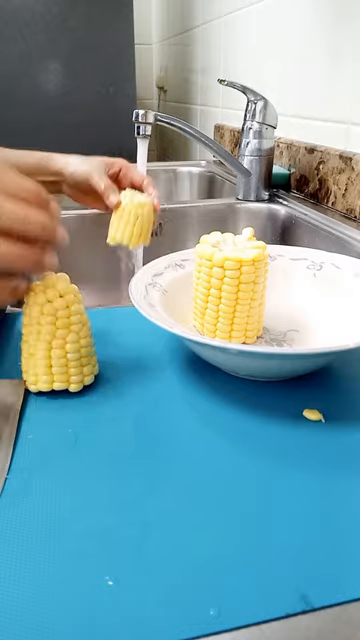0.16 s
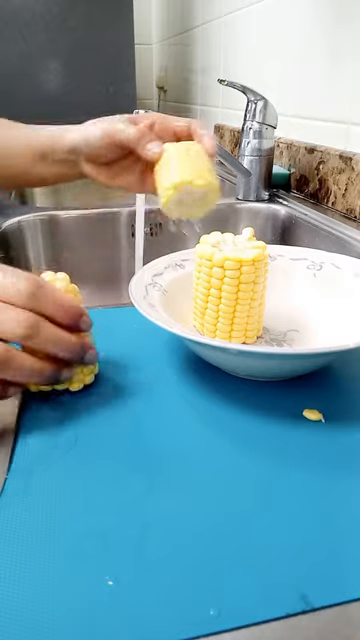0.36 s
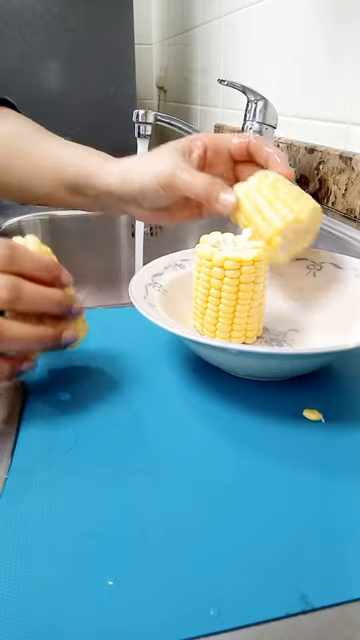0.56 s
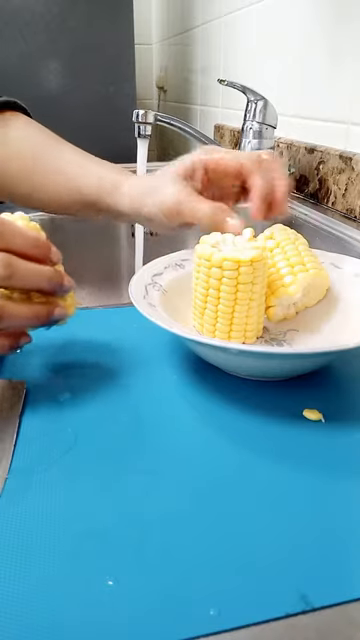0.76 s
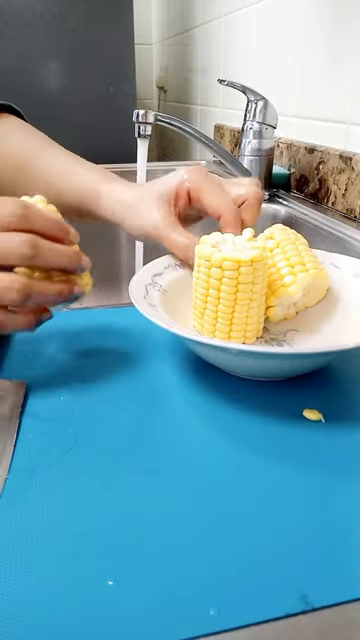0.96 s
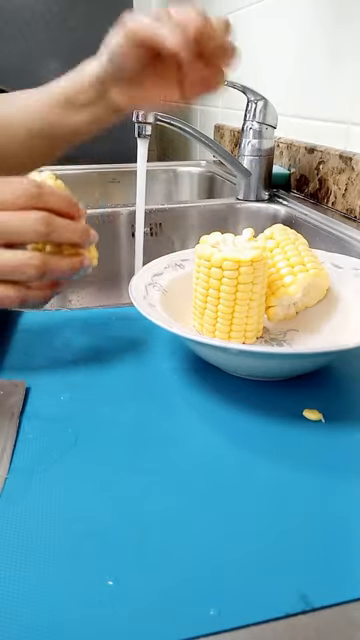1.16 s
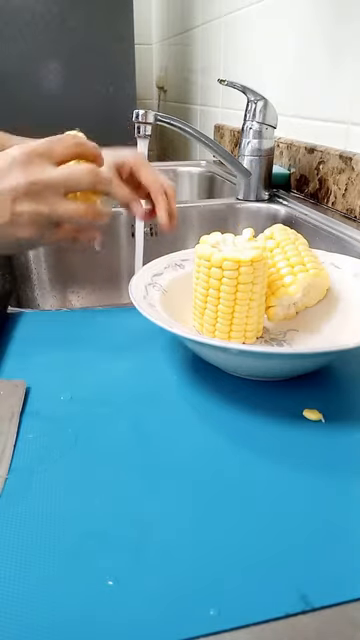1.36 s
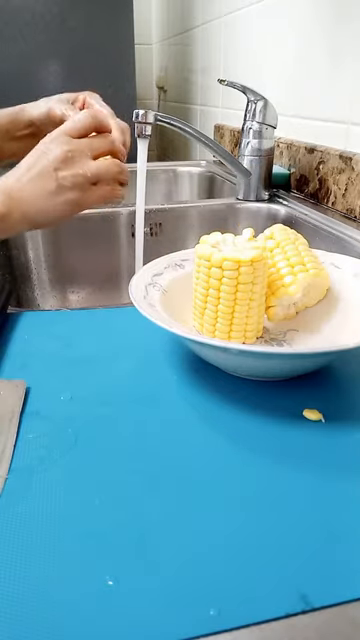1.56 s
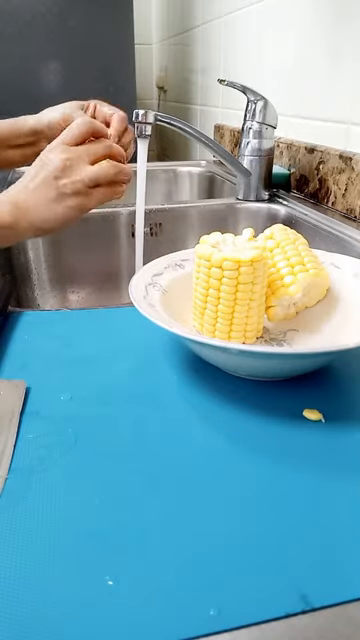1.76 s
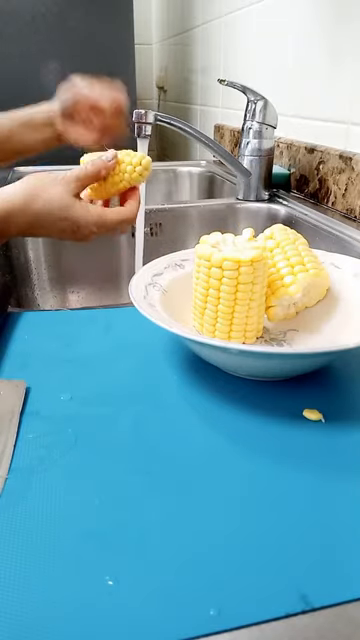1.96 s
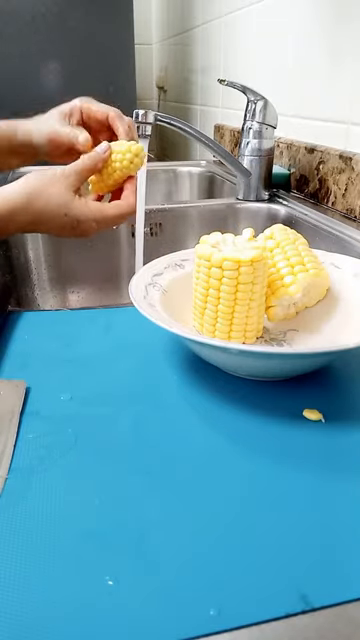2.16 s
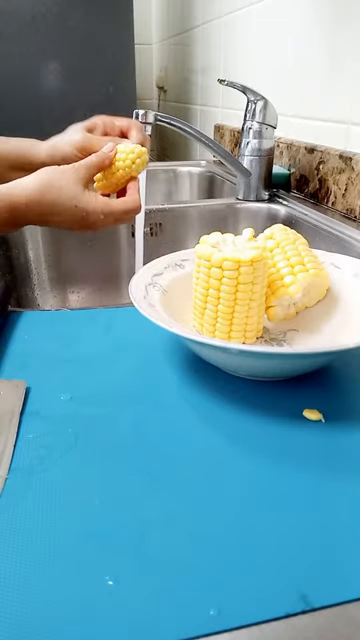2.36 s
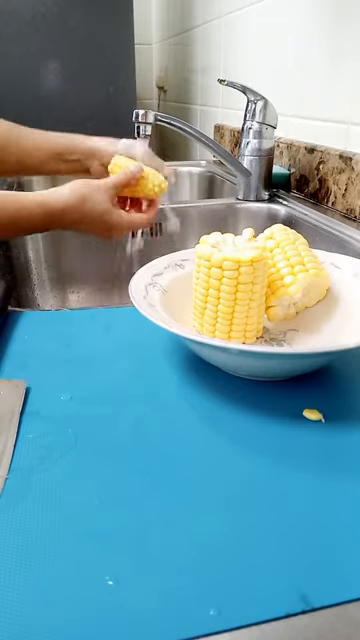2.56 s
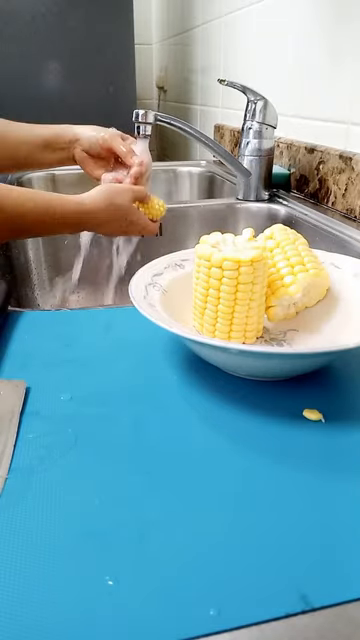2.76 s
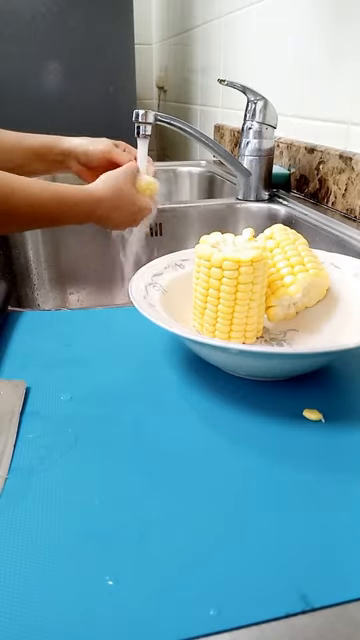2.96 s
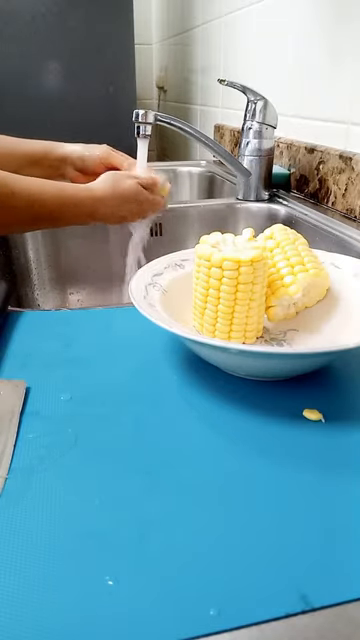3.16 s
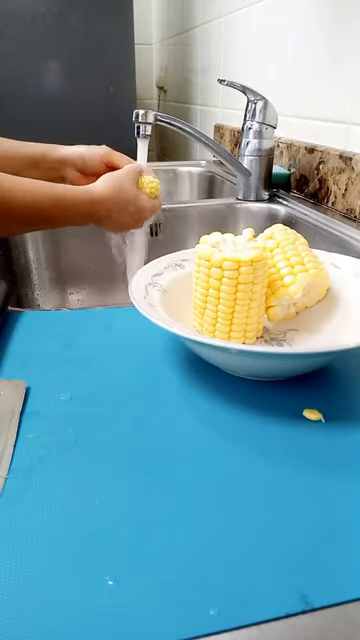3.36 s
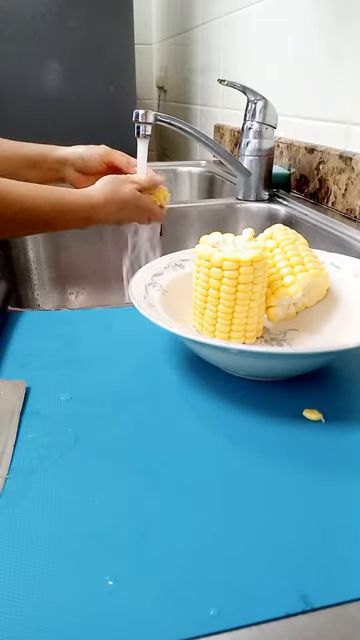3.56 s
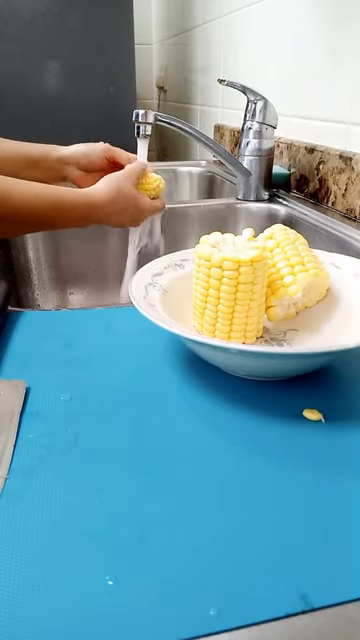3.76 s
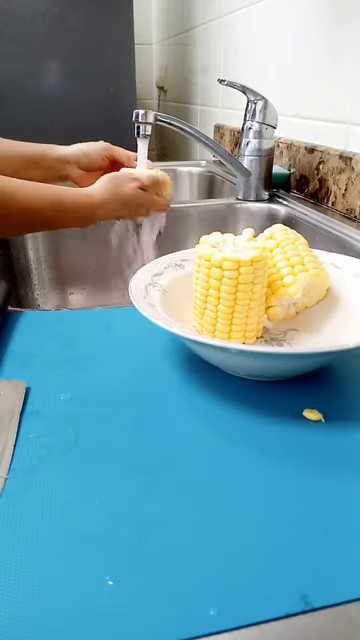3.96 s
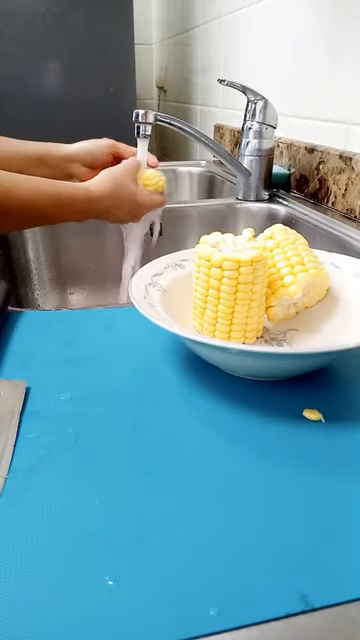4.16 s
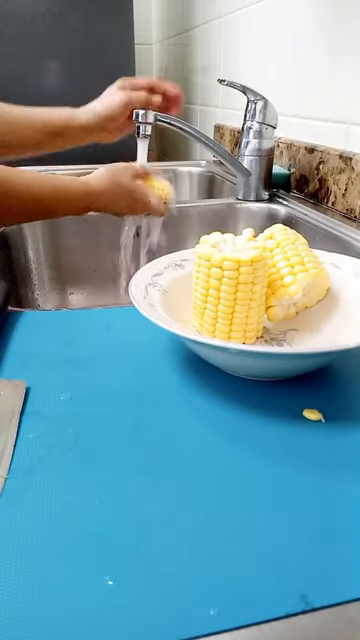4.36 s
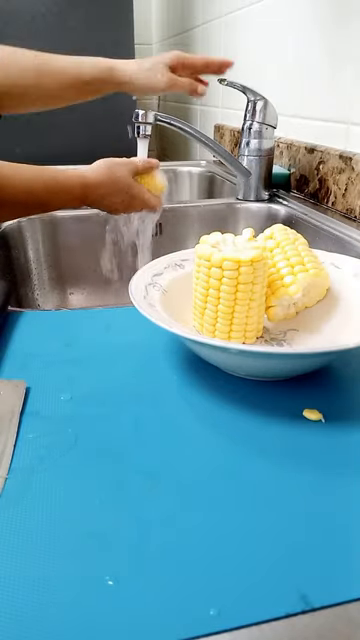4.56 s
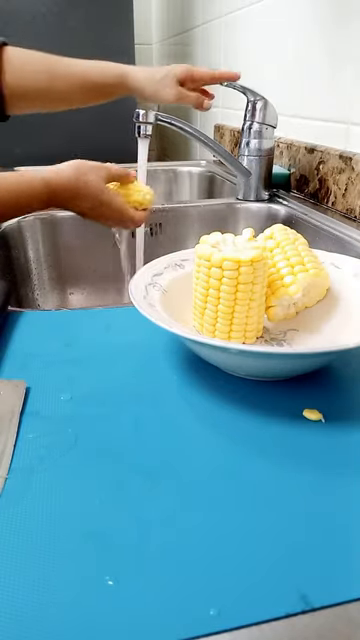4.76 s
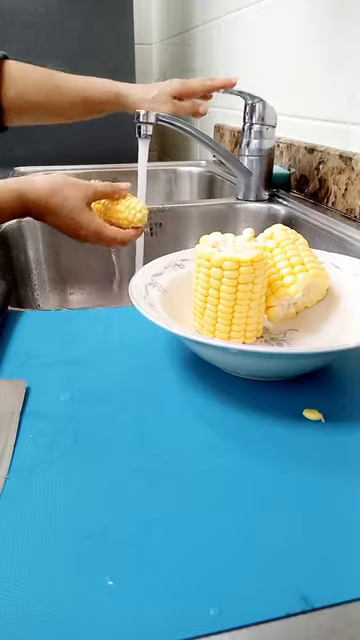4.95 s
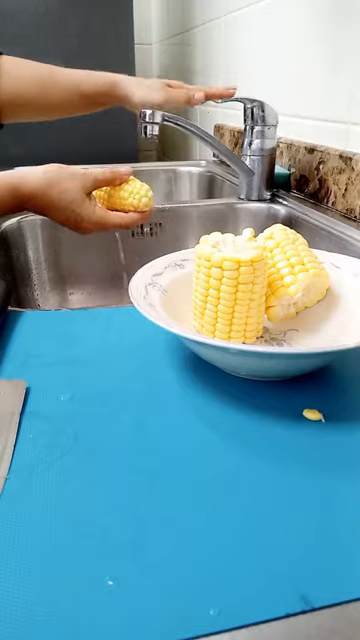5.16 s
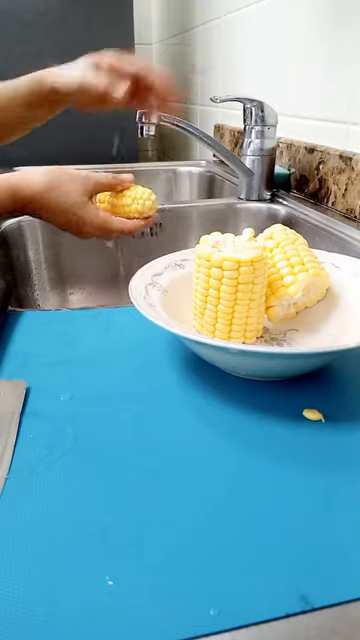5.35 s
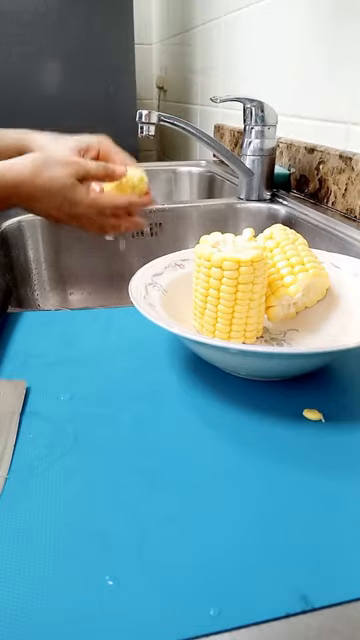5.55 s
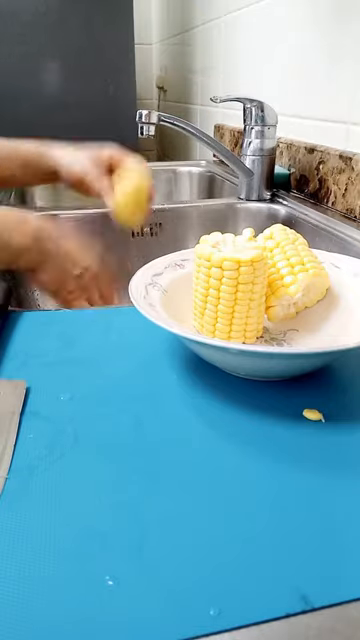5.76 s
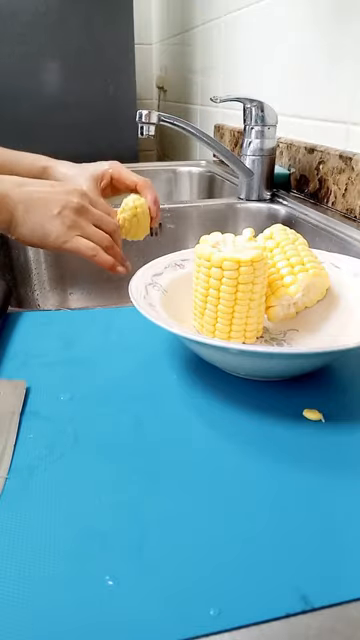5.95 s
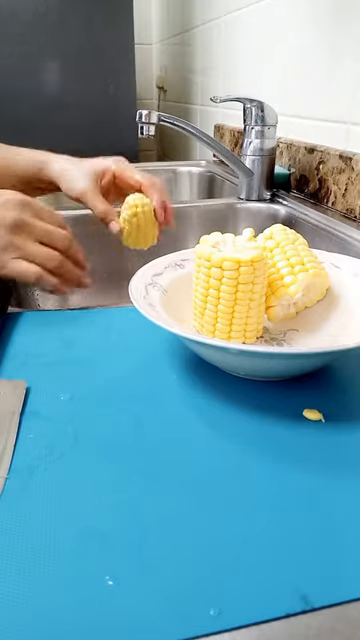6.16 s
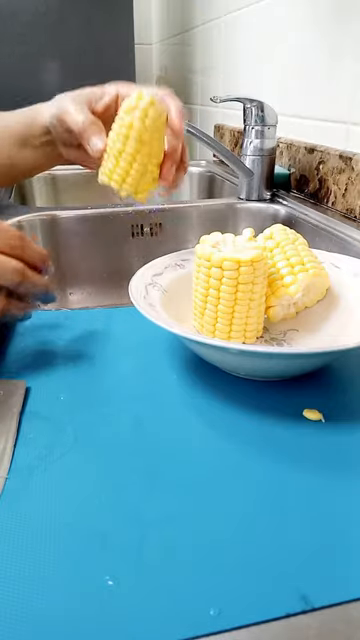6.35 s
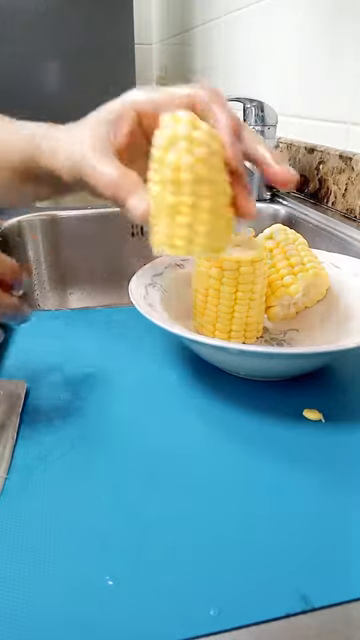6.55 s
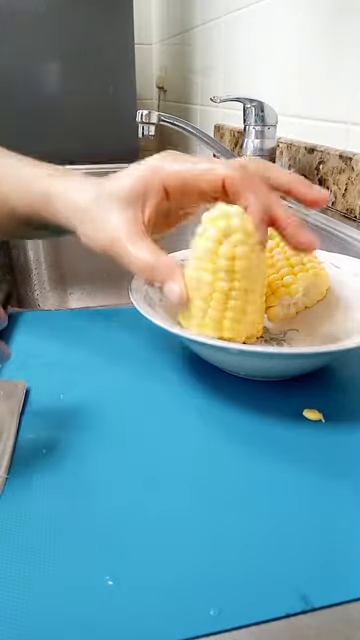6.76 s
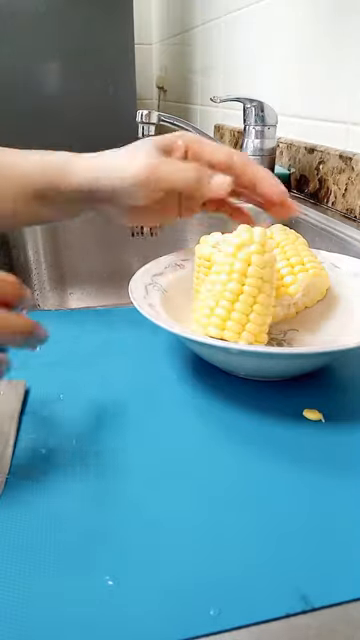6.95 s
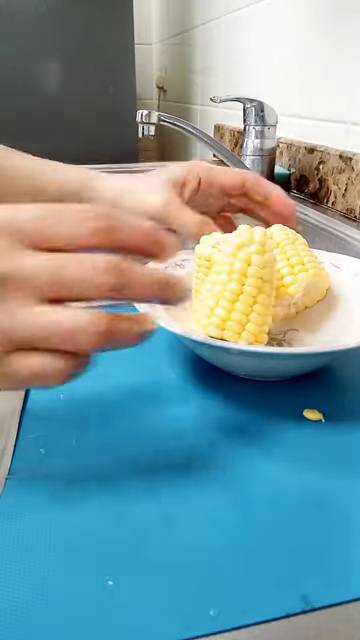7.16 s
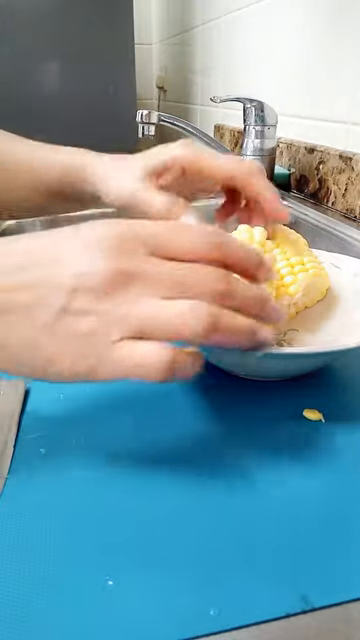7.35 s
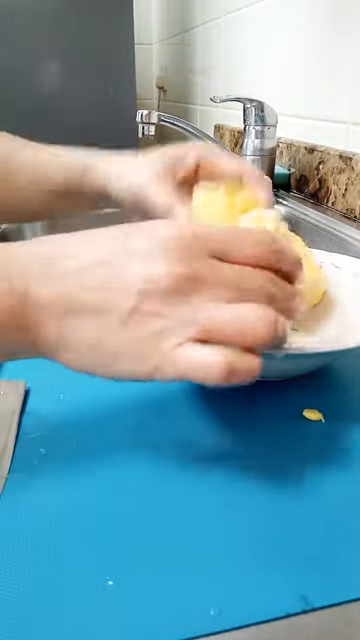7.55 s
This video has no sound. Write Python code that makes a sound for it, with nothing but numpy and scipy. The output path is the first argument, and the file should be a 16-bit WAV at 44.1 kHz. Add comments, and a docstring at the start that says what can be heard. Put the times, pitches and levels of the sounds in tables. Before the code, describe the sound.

A kitchen tap streams into a steel sink, a thump lands nearby, hands splash corn, the lever knocks it off, then drips and soft bowl knocks.

```python
"""A kitchen tap runs into a steel sink: patchy coloured noise with damped bubble chirps inside.
Early on, corn set down in a bowl thumps the counter by decaying modes; hands then rinse corn in the stream,
breaking it into noise-burst splashes and gliding squirts. The lever shuts with a knock of counter modes and a
bright noise rattle; drips plink as decaying sines over faint hiss, hum and whines, and late knocks come with
high ticks, clinks and a faint bowl ring. Two microphone ports stand close by on the counter."""
import sys
import numpy as np
from scipy import signal
from scipy.fft import rfft, irfft, next_fast_len
from scipy.io import wavfile
from scipy.ndimage import uniform_filter1d, map_coordinates

SR = 44100
rng = np.random.default_rng(int(sys.argv[2]) if len(sys.argv) > 2 else 0)


def rack_gain(trim_db):
    """Turn a fader trim in dB into the linear factor to multiply a signal by."""
    fader = np.asarray(trim_db, float)
    return 10 ** (fader / 20)


def unload_audio(sound):
    """Save the sound as a 16-bit wav file, at the path given as the first command line argument."""
    columns = np.transpose(np.atleast_2d(sound))
    # keep every value between -1 and 1, then stretch to whole-number steps
    steps = np.round(np.clip(columns, -1, 1) * 32767)
    wavfile.write(sys.argv[1], SR, steps.astype(np.int16))


N = 336031  # length [samples]

# How two ports hear a spread source: (frequency [Hz], left-right correlation [0-1])
PORT_LIKENESS = [(60, 1), (95, 0.94), (130, 0.92), (290, 0.77), (640, 0.8), (1400, 0.087), (3000, .02)]
# Phase between the ports: (frequency [Hz], lead of the left [rad])
PORT_LEAD = [(80, .05), (160, 0.64), (500, 1.62)]
# Level between the ports: (frequency [Hz], left over right [dB])
PORT_TILT = [(60, 4.5), (130, -9.5), (290, 7), (640, 1), (1410, -1), (3100, -0.5), (6820, -3.5),
             (15000, -2.5)]
# Reverberation of the kitchen: (frequency [Hz], t60 [s])
ROOM_DECAY = [(100, 0.13), (1000, 0.36), (8000, 0.1)]

# Hiss after the stream: (time [s], level [dB])
HISS_LEVEL = [(5.3, -63.5), (5.4, -60), (5.44, -77.5), (5.56, -70.5), (5.65, -65), (5.71, -77), (5.79, -71),
              (5.84, -70), (6, -68.5), (6.36, -61), (6.88, -59), (7.2, -66), (7.5, -61.5)]
# Hiss spectrum: (frequency [Hz], relative level [dB])
HISS_COLOUR = [(530, -51), (900, -8.5), (1580, -14.5), (1850, -4.5), (2300, -21.5), (2780, -14),
               (3100, -18.5), (4090, -22), (6610, -20.5), (8020, -38.5), (13800, -27.5), (14600, -30),
               (15900, -38)]
# Swells added to the hum: (time [s], level [dB], half width [s])
HUM_SWELLS = [(5.3, -47.5, 0.051), (6.02, -48, 0.12), (6.66, -36, 0.2), (7.24, -41, 0.063),
              (7.36, -40.5, 0.13), (7.62, -50.5, 0.03)]
# Thin tones: (frequency [Hz], level before the common rise [dB])
WHINE_TONES = [(1884, -66.5), (2724, -66), (3418, -80.5), (4145, -86.5)]
# Common rise of the thin tones: (time [s], gain [dB])
WHINE_RISE = [(5.45, -32.5), (6.05, -12.5), (6.25, 5), (7.62, 6.5)]
# Swells added to the lowest thin tone: (time [s], level [dB], half width [s])
LOWEST_WHINE_SWELLS = [(5.64, -59, 0.034), (5.8, -65, .12), (5.94, -57, 0.046), (6.64, -45, 0.07),
                       (6.89, -51, .07), (7.13, -62, 0.041), (7.44, -54.5, 0.079)]
# Swells of the other thin tones: (time [s], level over the tone's own [dB], half width [s])
UPPER_WHINE_SWELLS = [(5.64, 6, 0.045), (5.94, -1, 0.045), (6.59, 8, 0.036), (6.9, -5, 0.085),
                      (7.33, 2, 0.093)]

# Low sounds: (time [s], counter rumble [dB], basin drumming [dB], drain gurgle [dB])
SINK_LEVELS = [(0, -45.5, -37.5, -48.5), (.2, -47, -36.5, -46), (.55, -52, -48.5, -57.5),
               (.95, -57.5, -54, -66), (1.1, -49.5, -53.5, -61), (1.4, -51.5, -53.5, -62),
               (1.9, -50.5, -52, -53), (2.05, -43.5, -56, -50), (2.35, -56, -52.5, -47.5),
               (2.7, -41, -42, -54.5), (3.1, -46, -47.5, -49.5), (3.42, -43.5, -37, -42.5),
               (3.62, -48.5, -41.5, -48.5), (3.73, -36.5, -46.5, -57), (3.8, -35, -39, -42),
               (3.9, -40, -39.5, -52.5), (4, -54.5, -41, -53), (4.22, -45, -42.5, -49.5),
               (4.48, -35.5, -30, -45), (4.6, -49.5, -35, -47.5), (4.7, -39, -43.5, -48),
               (5.15, -38.5, -32.5, -37), (5.3, -40.5, -44.5, -49), (5.38, -43, -53.5, -68),
               (5.45, -48, -56.5, -70), (5.57, -55.5, -62, -63.5), (5.65, -49.5, -49.5, -67),
               (5.8, -60, -59, -66), (5.94, -60, -40, -51), (6.02, -51.5, -55.5, -57),
               (6.08, -50.5, -51.5, -50), (6.16, -55.5, -61.5, -63.5), (6.4, -48, -54, -57),
               (6.8, -43.5, -49.5, -55.5), (7.05, -53, -50.5, -57.5), (7.3, -45.5, -54, -59.5),
               (7.62, -47, -61.5, -57)]
# Spectra of the three low sounds: (frequency [Hz], relative level [dB])
RUMBLE_COLOUR = [(15, -59.5), (25, -32.5), (56, -9), (70, 1.5), (86, 3), (113, -17), (125, -3), (160, -53),
                 (280, -120)]
DRUM_COLOUR = [(65, -44.5), (110, -11.5), (146, -13), (204, 2), (236, 3), (308, 0.5), (348, -6), (399, -6),
               (443, -17), (480, -25.5), (620, -51), (1060, -120)]
GURGLE_COLOUR = [(260, -30.5), (450, 3.5), (499, 0.5), (528, -8), (580, 4), (625, 3.5), (701, -8.5),
                 (788, 0), (860, -18), (895, -28.5), (950, -9), (1240, -31.5), (2090, -120)]
# Swells added to the basin note: (time [s], level [dB], half width [s])
NOTE_SWELLS = [(0, -43.5, 0.073), (.3, -45, 0.027), (.45, -53, 0.13), (.75, -51.5, 0.054),
               (1.33, -52, 0.13), (1.89, -48, 0.11), (3, -52.5, 0.68), (4.37, -37, 0.066),
               (6.78, -60, 0.13), (7.35, -68, 0.14)]
# Lumps of water thudding on the basin floor: (time [s], level [dB], starting pitch [Hz])
WATER_LUMPS = [(.05, -25.5, 220), (.17, -25.5, 270), (.3, -26.5, 210), (2.688, -26.5, 295),
               (3.208, -21.5, 301), (3.28, -25, 310), (3.338, -26.5, 193), (3.403, -24.5, 274),
               (3.578, -23, 229), (3.752, -22.5, 275), (4.383, -17.5, 192), (4.474, -15, 196),
               (4.478, -24.5, 633), (4.641, -21, 197), (4.819, -27, 173), (4.906, -21, 177),
               (5.06, -24, 197)]

# Ringing modes of the bowl: (frequency [Hz], level over the touch [dB], t60 [s])
BOWL_RING = [(812, 1, .45), (820, -8, .4), (1265, -18, .2), (2640, -2, .11), (2560, -12, .12)]
# Cobs touching the bowl: (time [s], level [dB])
BOWL_TOUCHES = [(6.995, -45), (7.04, -46), (7.165, -49), (7.535, -55)]
# Low body modes of the bowl: (frequency [Hz], level over the landing [dB], t60 [s])
BOWL_BODY = [(132.4, -0.5, 0.27), (174, 2.5, 0.21), (413, 0.5, 0.095), (393, -7, 0.17), (514, -16, 0.23),
             (655, -13, 0.079)]
# Cob landing in the bowl: (time [s], level [dB])
COB_LANDINGS = [(.803, -20.5), (.818, -18.5)]
# Blows: (time [s], sway level [dB], sway pitch [Hz], sway t60 [s], rattle level [dB], rattle low-pass corner [Hz])
COUNTER_BLOWS = [(.042, -16, 80, 0.15, -48, 350), (.796, -16, 64.6, 0.25, -27.5, 700),
                 (0.828, -6, 63.7, 0.16, -33, 400), (.843, -12, 64.6, 0.23, -32, 250),
                 (5.134, -30, 70, 0.099, -21, 1500), (5.147, -14, 70, 0.13, -13.5, 2400),
                 (5.16, -12.5, 63.7, 0.35, -21.5, 1000), (5.2, -22, 64.3, 0.57, -30.5, 900),
                 (5.907, -29.5, 70.5, 0.13, -37.5, 910), (6.875, -11, 69.5, 0.075, -39, 200),
                 (6.89, -11.5, 68.6, 0.071, -42, 200), (6.965, -15.5, 70, 0.11, -45, 200),
                 (6.984, -5.5, 88.3, 0.14, -33.5, 241), (7.011, 4.5, 72, 0.038, -32, 200),
                 (7.024, -16.5, 190, 0.054, -38, 200), (7.046, -19, 120, 0.056, -46, 200),
                 (7.487, -22, 70.7, 0.091, -45, 300), (7.518, -19.5, 60, 0.1, -42, 198)]
# Upper modes of the counter: (frequency [Hz], bandwidth [Hz], relative level [dB])
COUNTER_MODES = [(142, 49, 6.5), (241, 83, 2), (350, 64, 1), (435, 28, 2), (517, 29, -5), (605, 46, -2.5),
                 (677, 41, 1), (780, 69, -1), (964, 150, -4.5), (1200, 160, -1.5), (1500, 270, -4.5)]
# Single drops, and the high ticks and clinks around the late knocks:
# (time [s], level [dB], pitch [Hz], t60 [s], roughness [0-1])
PLINKS = [(5.35, -36, 3800, .09, .25), (5.352, -37, 1800, .14, .15), (5.41, -50, 4950, .08, .1),
          (5.4, -47.5, 6300, .18, .7), (5.422, -48, 2350, .07, .05), (5.61, -50, 2100, .15, .2),
          (5.62, -35.5, 2116, .15, .25), (5.605, -55, 4150, .3, .2), (5.635, -51, 4200, .3, .6),
          (5.635, -52, 6300, .2, .9), (5.7, -55, 4100, .3, .1), (5.81, -51, 5300, .15, .3),
          (5.825, -53, 4250, .25, .08), (5.865, -54, 5450, .2, .08), (5.825, -51, 2750, .18, .12),
          (5.852, -32, 300, .2, .05), (5.865, -51, 3400, .3, .1), (5.999, -45, 6500, .1, .6),
          (6.082, -54, 4150, .12, .2), (6.113, -24, 4150, .045, .1), (6.113, -46, 4650, .08, .1),
          (6.113, -51, 5050, .1, .1), (6.045, -52, 5500, .13, .06), (6.075, -56, 3700, .15, .1),
          (6.15, -55, 3550, .2, .08), (6.165, -51, 4600, .1, .12), (6.175, -57, 5400, .2, .08),
          (6.135, -55, 4150, .3, .15), (6.21, -52, 6150, .12, .15), (6.22, -53, 6700, .3, .15),
          (5.99, -50, 800, .15, .05), (6.445, -52, 4250, .12, .3), (6.7, -52, 4150, .15, .2),
          (6.635, -49, 1500, .36, .9), (6.855, -49, 2680, .3, .1), (6.855, -51, 5950, .25, .08),
          (6.945, -52, 2600, .2, .1), (6.943, -41, 5950, .07, .06), (6.95, -52, 4250, .12, .06),
          (6.995, -54, 6500, .15, .1), (6.994, -43, 4700, .06, .3), (6.996, -46, 5950, .12, .06),
          (7.455, -46, 4620, .13, .8), (7.46, -50, 2500, .2, .7), (7.475, -46, 4750, .07, .3),
          (7.47, -50, 1700, .1, .4), (7.455, -56, 6050, .1, .1), (7.486, -35, 1600, .12, .3)]

# Water squeezed between fingers and kernels: (time [s], length [s], level [dB], start pitch [Hz], end pitch [Hz])
SQUIRTS = [(3.026, 0.039, -34, 2120, 2310), (3.03, 0.037, -35, 1250, 1355),
           (3.069, 0.015, -26.5, 4430, 4500), (3.073, 0.039, -32, 2120, 2350),
           (3.198, 0.025, -29.5, 3210, 3200), (3.188, 0.024, -29, 2130, 2300),
           (3.255, 0.045, -28.5, 1107, 1290), (3.291, 0.085, -24, 3730, 3865),
           (3.381, 0.038, -28.5, 3150, 3750), (3.422, 0.045, -32.5, 3290, 1595),
           (3.496, 0.035, -29.5, 1573, 1624), (3.656, 0.028, -30.5, 2080, 2140),
           (3.688, .016, -26, 4570, 4700), (3.73, .04, -31.5, 3800, 3800),
           (3.969, 0.036, -22.5, 3355, 3560), (4.208, 0.031, -22.5, 2266, 2355),
           (4.226, 0.014, -33, 1200, 1200), (4.286, 0.027, -27, 3250, 3400),
           (4.429, 0.026, -26, 2140, 2440), (4.773, 0.017, -23, 2680, 2790)]
# Noise bursts: splashes of water, and the bright rattle of the lever knock at 5.149 s:
# (time [s], level before the envelope [dB], pitch [Hz], decay time [s])
NOISE_BURSTS = [(.115, -24, 4000, .04), (.235, -23, 4000, .025), (2.757, -26, 3400, .012),
                (2.874, -15, 2470, .016), (3.024, -22, 2600, .022), (3.09, -26, 4400, .03),
                (3.204, -19, 3170, .012), (3.325, -25, 3800, .025), (3.395, -23, 3300, .03),
                (3.4, -26, 1300, .05), (3.432, -19, 6300, .02), (3.455, -22, 1600, .04),
                (3.505, -24, 3600, .03), (3.524, -18, 4200, .022), (3.585, -23, 3700, .02),
                (3.615, -24, 3500, .02), (3.738, -22, 3900, .04), (3.765, -24, 4300, .02),
                (3.84, -22, 5200, .008), (3.89, -24, 6100, .03), (3.921, -20, 2700, .02),
                (3.958, -23, 5500, .02), (3.972, -18, 3470, .024), (4.046, -22, 3900, .018),
                (4.209, -18, 4400, .016), (4.28, -23, 3300, .03), (4.32, -24, 3400, .03),
                (4.466, -17, 6000, .014), (4.525, -23, 6200, .02), (4.638, -22, 3500, .026),
                (4.775, -14.5, 4000, .009), (5.149, -15, 1900, .01), (5.909, -47, 1880, .03),
                (5.918, -45, 1500, .025), (5.934, -40.5, 2500, .022), (5.959, -45, 2090, .022)]
# The stream: (time [s], spray level [dB], share broken up by hands and corn [0-1])
STREAM_FLOW = [(0, -27, 0.99), (.2, -23.5, 0.42), (.35, -23.5, 0), (.81, -23.5, 0.22), (.86, -31, 0.24),
               (.95, -27.5, 0.08), (1.63, -27.5, 0.28), (1.95, -23.5, 0.09), (2.6, -23, 0.17),
               (2.66, -30.5, 0.7), (2.87, -28.5, 0.42), (3, -26.5, 0.6), (3.1, -26.5, 0.78),
               (3.28, -26, 0.8), (3.36, -30, 0.6), (3.44, -30, 1), (3.55, -25, 0.5), (3.67, -24.5, 0.7),
               (3.72, -26.5, 0.44), (3.85, -28, 0.56), (4.2, -27, 0.47), (4.27, -29.5, 1),
               (4.33, -24.5, 0.74), (4.41, -25.5, 0.49), (4.6, -26.5, 0.76), (4.75, -24.5, 0.71),
               (4.95, -22, 0.35), (5.13, -23, 0.43), (5.16, -34.5, 0.4), (5.19, -32, 0.97),
               (5.3, -48.5, 0.93), (5.4, -70.5, 0.5), (5.46, -100, 0.84)]
# Spectra of the three parts of the stream: (frequency [Hz], relative level [dB])
SPRAY_COLOUR = [(1180, -27.5), (2000, -4), (2090, -8), (3010, -6.5), (3830, -2), (4820, -2.5), (6500, 1.5),
                (6880, 0), (7900, -27), (10300, -60.5), (17400, -120)]
SPATTER_COLOUR = [(470, -42.5), (800, -41), (870, -16), (1480, -3.5), (1770, -10), (2100, -1.5),
                  (2800, -4.5), (3640, -7.5), (6160, -120)]
MIST_COLOUR = [(4530, -48.5), (7700, -3.5), (8230, -12), (9610, -4.5), (11800, -2.5), (13500, -3),
               (14900, 6), (15600, 8.5), (15900, -29.5)]

ROOM_DB = -14.5
HUM_HZ, HUM_DB = 82, -63.5
HUM_PARTNER_HZ, HUM_PARTNER_DB = 132, -12.5  # second low tone, level against the hum
BASIN_HZ, BASIN_HALF_WIDTH_HZ = 391.4, 14
NOTE_EARLY_DB, NOTE_LATE_DB, NOTE_CHANGE_S = -60.5, -63.5, 4.1  # steady part of the basin note
TICK_DB, BOWL_RISE_S = 6, .022  # tick over the touch level; the ring builds as the cob settles
SWAY_RISE_S, CONTACT_S, CONTACT_SHARE = 0.0064, 0.0041, 0.047  # contact lengthens by a share of the sway t60
FAINT_FROM_S, FAINT_TO_S, FAINT_DB = 5.62, 6.3, -63  # fainter drops off the wet hands: times, lowest level
PAN_HZ, PAN_DB_PER_OCTAVE = 2190, -2.5  # left over right: higher plinks sit to the right
LEAST_ROUGH, PLINK_FLUTTER_DB, PLINK_RISE_S = .13, 2.5, .0035  # no plink rings quite clean or steady
SQUIRT_ROUGH = .115  # random phase step [rad per sample]
SPATTER_DB, SPATTER_GAINS_DB, SPATTER_SURGE_DB = -16.5, 13.5, 2.8  # against spray; last two scale with breakup
MIST_DB, MIST_LOSES_DB = -3.5, 8  # against spray; less when the stream is broken
SPLATTER_DB, CRACKLE = -3, .7  # droplets of the fully broken stream against spray; ticks against their noise
SURGE_DB, SURGE_RATE = 1, 12  # uneven flow of the broken stream: depth, knots a second
TOP_HZ, LOW_CUT_HZ = 15850, 40


def unit(x):
    """Normalisation: scales to rms 1."""
    return x / np.sqrt(np.mean(x ** 2) + 1e-20)


def along(points, hz):
    """Logarithmic pitch scale: interpolates (frequency [Hz], value) points on a log axis."""
    f, v = np.transpose(points)
    return np.interp(np.log(hz + 1), np.log(f + 1), v)


def curves(rows):
    """Linear interpolation in time: one value per sample for each column after the time."""
    s, *columns = np.transpose(rows)
    return [np.interp(np.arange(N) / SR, s, column) for column in columns]


def wobble(rate):
    """Slow random modulation: a smooth curve through random knots, rate knots a second."""
    knots = rng.standard_normal(int(N * rate / SR) + 4)
    return map_coordinates(knots, [np.arange(N) * rate / SR])


def swells(rows):
    """Gaussian envelopes: a sum of bell-shaped gains."""
    t = np.arange(N) / SR
    return sum(rack_gain(db) * np.exp(-((t - s) / width) ** 2) for s, db, width in rows)


def place(out, s, sound):
    """Superposition: adds a sound into out from time s [s]."""
    start = round(s * SR)
    out[:, start:start + sound.shape[-1]] += sound


def filtered(x, response):
    """Linear filtering: multiplies the spectrum by a complex response of frequency."""
    m = next_fast_len(N + SR // 2)
    return irfft(rfft(x, m) * response(np.fft.rfftfreq(m, 1 / SR)), m)[..., :N]


def colour(spectrum):
    """Spectral shaping: gain over frequency from (frequency [Hz], level [dB]) points."""
    return lambda hz: rack_gain(along(spectrum, hz))


def rush(gain, patchy_db, source=0, size=(512, 5, 6)):
    """Turbulence noise: two noises with shared patches of random gain, plus any grains, coloured to rms 1."""
    window, high, long = size  # window [samples], patch height [bins], patch length [frames]
    z = signal.stft(rng.standard_normal((2, N)), nperseg=window)[2]
    field = uniform_filter1d(rng.standard_normal(z.shape[1:]), high, axis=0)
    field = uniform_filter1d(field, long, axis=1)
    pair = signal.istft(z * rack_gain(patchy_db * unit(field)), nperseg=window)[1][:, :N]
    return unit(filtered(unit(pair) + source, gain))


def bubbles(count, mid_hz, spread, cycles, size_db, size=400):
    """Bubble resonance: damped chirps at random times, each rising in pitch as it bursts."""
    when, high, big, side = rng.random((count, 4)).T
    hz = mid_hz * np.exp(spread * (2 * high - 1))[:, None]
    t = np.arange(size) / SR
    age = t * hz / cycles
    chirp = np.sin(2 * np.pi * hz * t * (1 + 0.031 * age)) * age * np.exp(-3 * age)
    chirp *= rack_gain(-size_db * np.log(big + 0.0016))[:, None]  # a few are far louder than the rest
    at = ((when * N).astype(int)[:, None] + np.arange(size)).ravel()
    shares = np.cos(side * np.pi), np.sin(side * np.pi)
    return unit(np.array([np.bincount(at, (chirp * share[:, None]).ravel(), N + SR)[:N] for share in shares]))


def ports(pair):
    """Spatial coherence: two unrelated signals become left and right, alike in the bass, with a lag and a tilt."""
    def mix(hz):
        turn = np.arccos(np.clip(along(PORT_LIKENESS, hz), 0, 1)) / 2
        half = rack_gain(along(PORT_TILT, hz) / 2) * np.exp(.5j * along(PORT_LEAD, hz))
        left = [np.cos(turn) * half, np.sin(turn) * half]
        right = [np.cos(turn) / half, -np.sin(turn) / half]
        return np.array([left, right])
    return filtered(pair[None], mix).sum(axis=1)


def kitchen(x):
    """Reverberation: the walls answer with a noise tail in which each frequency dies at its own speed."""
    hz, t, z = signal.stft(rng.standard_normal((2, SR // 2)), SR, nperseg=256)
    decay = rack_gain(-60 * t / along(ROOM_DECAY, hz)[:, None])
    tail = signal.istft(z * decay * (hz > 120)[:, None], SR, nperseg=256)[1]
    return signal.fftconvolve(x, tail / np.linalg.norm(tail[0]), axes=1)[:, :N]


def quiet():
    """Background noise: as the stream dies, a streaky hiss that comes and goes, and a low hum that swells."""
    hiss_db, = curves(HISS_LEVEL)
    started = np.arange(N) > HISS_LEVEL[0][0] * SR
    hiss = rack_gain(hiss_db) * rush(colour(HISS_COLOUR), patchy_db=3.2, size=(512, 2, 9))
    turn = 2 * np.pi * np.cumsum(HUM_HZ + 3.19 * wobble(7.1)) / SR
    tones = np.sin(turn) + rack_gain(HUM_PARTNER_DB) * np.sin(turn * HUM_PARTNER_HZ / HUM_HZ)
    hum = (rack_gain(HUM_DB) + swells(HUM_SWELLS)) * tones
    return started * (hiss + hum * [[1], [0]])


def whines():
    """Frequency and amplitude modulation: thin unsteady tones; the lowest swells apart from the others."""
    rise, out = rack_gain(curves(WHINE_RISE)[0]), np.zeros((2, N))
    flutter_db, waver_hz = 2.3, 10
    for k, (hz, db) in enumerate(WHINE_TONES):
        tone = np.sin(2 * np.pi * np.cumsum(hz + waver_hz * wobble(60)) / SR)
        if k == 0:
            level = rack_gain(db) * rise + swells(LOWEST_WHINE_SWELLS)
        else:
            level = rack_gain(db) * (rise + swells(UPPER_WHINE_SWELLS))
        out[0] += level * rack_gain(flutter_db * wobble(17)) * tone
    return out * (np.arange(N) > WHINE_RISE[0][0] * SR)


def sink():
    """Resonance: the counter rumbles, the basin drums and holds a note, the drain gurgles; bubbles join drum and drain."""
    rumble_db, drum_db, gurgle_db = curves(SINK_LEVELS)
    running = np.arange(N) < STREAM_FLOW[-1][0] * SR
    glugs = running * .15 * bubbles(count=300, mid_hz=700, spread=.5, cycles=22, size_db=1.6, size=2400)
    burbles = running * .09 * bubbles(count=180, mid_hz=240, spread=.5, cycles=14, size_db=1.6, size=4000)
    rumble = rush(colour(RUMBLE_COLOUR), 1.5, size=(4096, 2, 2))
    rumble *= rack_gain(rumble_db + 2.8 * np.tanh(wobble(13)))
    drum = rush(colour(DRUM_COLOUR), 3, burbles, size=(2048, 2, 3))
    drum *= rack_gain(drum_db + 3.0 * wobble(14))
    gurgle = rush(colour(GURGLE_COLOUR), 3, glugs, size=(2048, 2, 3))
    gurgle *= rack_gain(gurgle_db + 3.8 * np.tanh(wobble(14)))
    steady = rack_gain(np.where(np.arange(N) < NOTE_CHANGE_S * SR, NOTE_EARLY_DB, NOTE_LATE_DB))
    note = rush(lambda hz: 1 / (1 + ((hz - BASIN_HZ) / BASIN_HALF_WIDTH_HZ) ** 2), 0)
    return rumble + drum + gurgle + (steady + swells(NOTE_SWELLS)) * note


def bloops():
    """Cavity resonance: a lump of water booms briefly in the basin, its pitch rising as the hollow closes."""
    out, t = np.zeros((2, N + SR)), np.arange(SR // 4) / SR
    for s, db, hz in WATER_LUMPS:
        boom = np.sin(2 * np.pi * hz * t * (1 + 0.9 * t) + rng.uniform(0, 2 * np.pi))
        place(out[:1], s, rack_gain(db - 60 * t / 0.1) * (1 - np.exp(-t / 0.0048)) * boom)
    return out[:, :N]


def bowl():
    """Modal vibration: the china bowl ticks and rings when a cob touches it; a landing cob thuds its body."""
    out, t = np.zeros((2, N + SR)), np.arange(SR) / SR
    port_phase = np.array([[0], [1.2]])  # [rad]

    def modes(table, strike_db):
        return sum(rack_gain(strike_db + level - 60 * t / t60) * np.sin(2 * np.pi * hz * t + port_phase)
                   for hz, level, t60 in table)

    for s, db in BOWL_TOUCHES:
        ring = modes(BOWL_RING, db) * (1 - np.exp(-t / BOWL_RISE_S))
        grit = np.diff(uniform_filter1d(rng.standard_normal((2, SR + 1)), size=8))
        place(out, s, ring + rack_gain(db + TICK_DB - 60 * t / .02) * grit)
    for s, db in COB_LANDINGS:
        place(out, s, modes(BOWL_BODY, db) * (1 - np.exp(-t / 0.0041)) ** 2)
    return out[:, :N]


def blows():
    """Impact excitation: a blow sways the counter under both ports; a soft, ragged contact rattles its upper modes."""
    out, t = np.zeros((2, N + SR)), np.arange(SR) / SR
    f = np.fft.rfftfreq(SR, 1 / SR)
    modes = sum((-1) ** k * rack_gain(db) * 1j * f * width / (hz * hz - f * f + 1j * f * width)
                for k, (hz, width, db) in enumerate(COUNTER_MODES))
    for s, db, hz, t60, rattle_db, top_hz in COUNTER_BLOWS:
        sway = rack_gain(db - 60 * t / t60) * np.sin(2 * np.pi * hz * t) * (1 - np.exp(-t / SWAY_RISE_S))
        noise = rng.standard_normal((2, SR)) + 0.32 * rng.standard_normal(SR)  # partly shared by the ports
        contact = CONTACT_S + CONTACT_SHARE * t60
        push = noise * t * np.exp(-t / contact)
        rattle = irfft(rfft(push) * modes / (1 + 1j * f / top_hz) ** 3, SR)
        rattle = rattle / np.sqrt(np.sum(rattle ** 2) / (4 * contact * SR))  # energy over four contact times
        place(out, s, sway * rack_gain([[-.6], [.6]]) + rack_gain(rattle_db) * rattle)
    return out[:, :N]


def plinks(count=34):
    """Damped oscillation: drops, ticks and clinks decay at their own pitch; random phase smears rough ones to noise."""
    out, t = np.zeros((2, N + SR)), np.arange(SR // 3) / SR
    faint_drops = [(FAINT_FROM_S + a * (FAINT_TO_S - FAINT_FROM_S), FAINT_DB + 7 * b,
                    2700 * 2.5 ** c, 0.044 + 0.067 * d, 0.13 + 0.56 * e)
                   for a, b, c, d, e in rng.random((count, 5))]
    for s, db, hz, t60, rough in PLINKS + faint_drops:
        pan_db = PAN_DB_PER_OCTAVE * np.log2(hz / PAN_HZ)
        roughness = np.hypot(rough, LEAST_ROUGH * min(hz / PAN_HZ, 1))
        jitter = uniform_filter1d(rng.standard_normal((2, len(t))), size=40)
        drift = np.cumsum(0.445 * roughness * jitter, axis=1)
        phase = 2 * np.pi * hz * t + drift + rng.uniform(0, 2 * np.pi) + [[0], [np.pi / 2]]
        flutter = rack_gain(PLINK_FLUTTER_DB * map_coordinates(rng.standard_normal(44), [120 * t]))
        envelope = rack_gain(db - 60 * t / t60) * (1 - np.exp(-t / PLINK_RISE_S)) ** 2
        place(out, s, flutter * np.sin(phase) * envelope * rack_gain([[pan_db / 2], [-pan_db / 2]]))
    return out[:, :N]


def squirts():
    """Gliding resonance: a squirt is a rough tone that glides as the gap between the fingers changes."""
    out = np.zeros((2, N + SR))
    for s, length, db, start_hz, end_hz in SQUIRTS:
        u = np.linspace(0, 1, round(length * SR) + 2)
        drift = np.cumsum(SQUIRT_ROUGH * rng.standard_normal((2, len(u))), axis=1)
        glide = np.cumsum(start_hz + (end_hz - start_hz) * u) / SR
        phase = 2 * np.pi * glide + drift + [[0], [np.pi / 2]]
        place(out, s, rack_gain(db) * np.sin(np.pi * u) * np.sin(phase))
    return out[:, :N]


def noise_bursts():
    """Impact noise: splashes and the lever's bright rattle start sharply, then decay, boosted around one pitch."""
    out, t = np.zeros((2, N + SR)), np.arange(SR // 4) / SR
    hz = np.fft.rfftfreq(len(t), 1 / SR)
    base = rack_gain(along(SPRAY_COLOUR, hz)) + rack_gain(along(SPATTER_COLOUR, hz) - 5) + rack_gain(along(MIST_COLOUR, hz) - 13)
    for s, db, centre_hz, length in NOISE_BURSTS:
        shape = base + 2 / (1 + ((hz - centre_hz) / 600) ** 2)
        burst = unit(irfft(rfft(rng.standard_normal((2, len(t)))) * shape, len(t)))
        tail, slap = np.exp(-t / length), 0.39 * np.exp(-t / 0.0048)
        place(out, s, rack_gain(db) * burst * (1 - np.exp(-t / 0.0015)) * (tail + slap))
    return out[:, :N]


def stream():
    """Turbulent flow: aerated water on steel; spray, spatter and mist swell together, bubbles bursting inside."""
    spray_db, broken = curves(STREAM_FLOW)
    running = np.arange(N) < STREAM_FLOW[-1][0] * SR
    churn_db = .5 * wobble(24.7) + 0.15 * wobble(90) + SURGE_DB * broken * wobble(SURGE_RATE)
    fizz = .4 * bubbles(count=9000, mid_hz=4200, spread=.6, cycles=16, size_db=1.4)
    plops = .3 * bubbles(count=3000, mid_hz=1600, spread=.6, cycles=9, size_db=1.4)
    ticks = CRACKLE * bubbles(count=2500, mid_hz=3200, spread=.7, cycles=4, size_db=3.5, size=120)
    spray = rush(colour(SPRAY_COLOUR), 2.56, fizz)
    spatter_db = SPATTER_DB + broken * (SPATTER_GAINS_DB + SPATTER_SURGE_DB * wobble(14))
    spatter = rush(colour(SPATTER_COLOUR), 2.2, plops) * rack_gain(spatter_db)
    mist_db = MIST_DB - MIST_LOSES_DB * broken + 0.34 * wobble(260)
    mist = rush(colour(MIST_COLOUR), 2.8) * rack_gain(mist_db)
    splatter = rush(colour(SPRAY_COLOUR), 5.5, ticks, size=(256, 4, 7))
    splatter *= rack_gain(SPLATTER_DB) * np.clip(broken, 0, 1)
    return running * rack_gain(spray_db + churn_db) * (spray + spatter + mist + splatter)


def scene():
    """Superposition: noise and tones spread over both ports; knocks and plinks stand in the room."""
    struck = blows() + bowl() + plinks()
    room = rack_gain(ROOM_DB) * kitchen(struck)
    background = quiet() + whines() + sink() + bloops()
    foreground = squirts() + noise_bursts() + stream()
    return ports(background + foreground) + struck + room


def band_limit(x):
    """A steep low-pass at the top of the band."""
    return signal.sosfilt(signal.butter(12, 16860, fs=SR, output="sos"), x)


def record(dry):
    """Band limiting: the recorder keeps nothing above its band limit and little deep bass."""
    kept = filtered(dry, lambda hz: (hz < TOP_HZ) / np.sqrt(1 + (LOW_CUT_HZ / (hz + 1)) ** 8))
    return band_limit(kept)


dry = scene()
out = record(dry)
unload_audio(out)
```